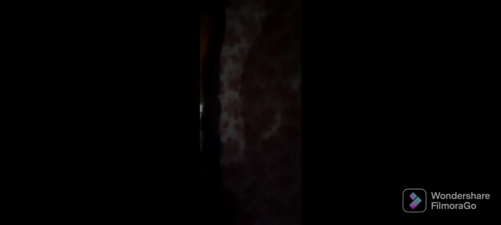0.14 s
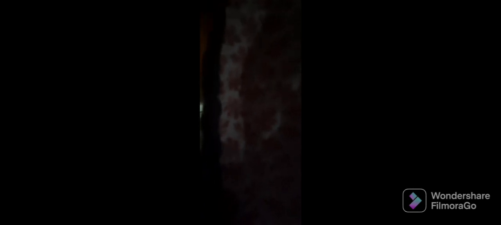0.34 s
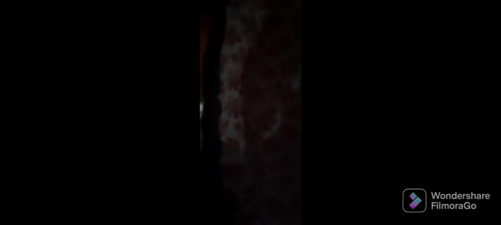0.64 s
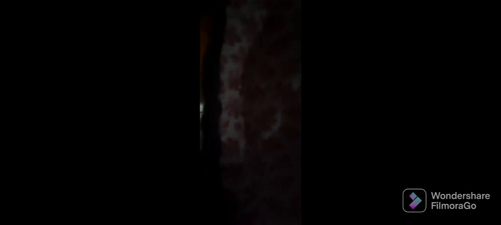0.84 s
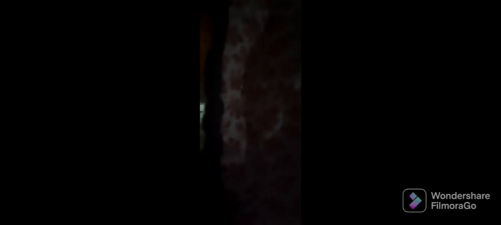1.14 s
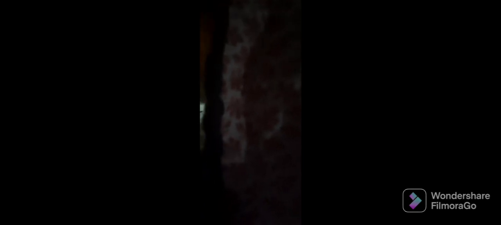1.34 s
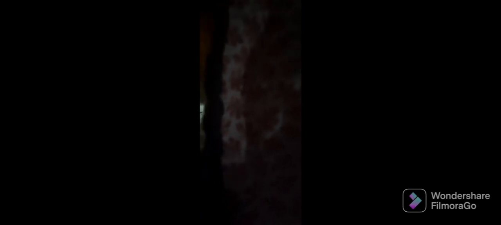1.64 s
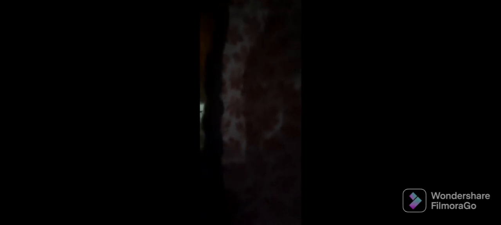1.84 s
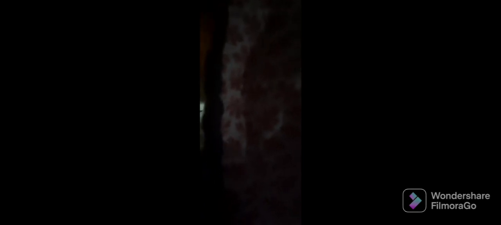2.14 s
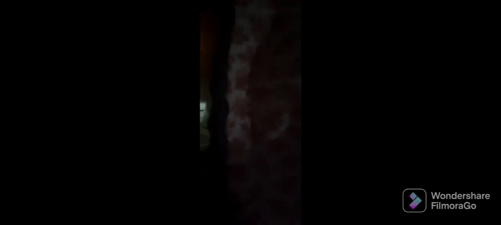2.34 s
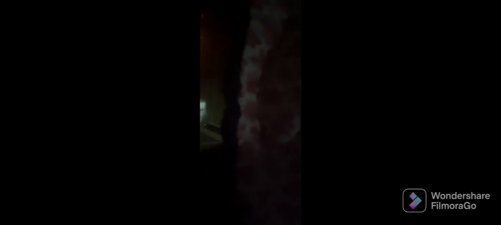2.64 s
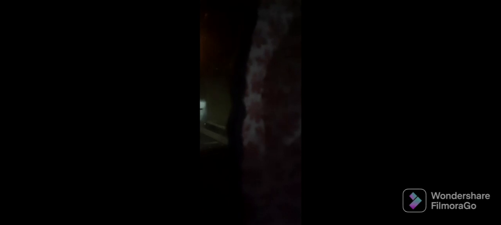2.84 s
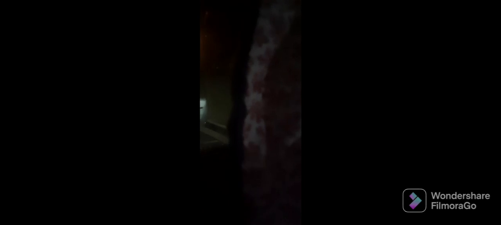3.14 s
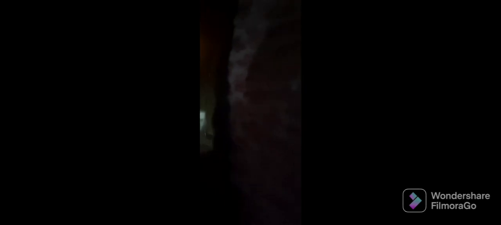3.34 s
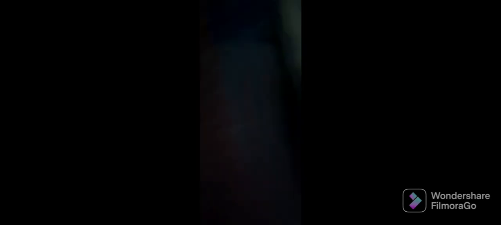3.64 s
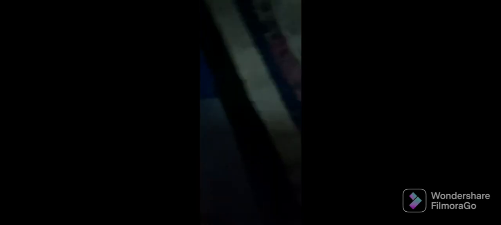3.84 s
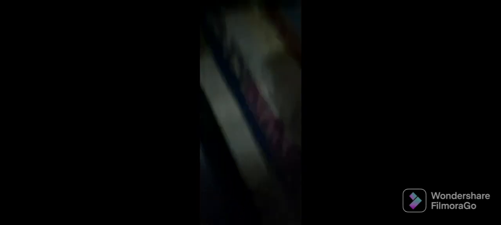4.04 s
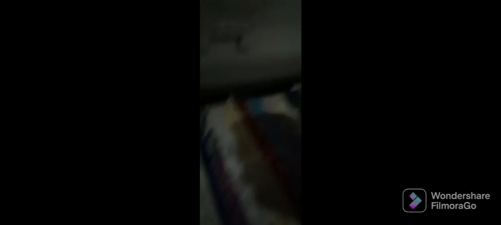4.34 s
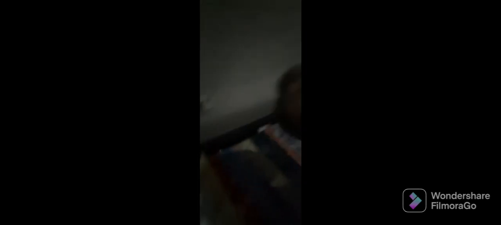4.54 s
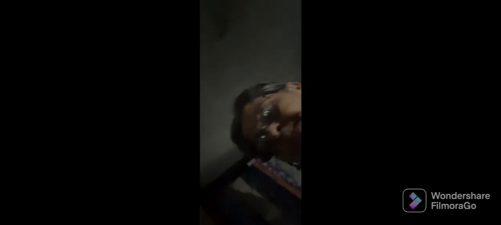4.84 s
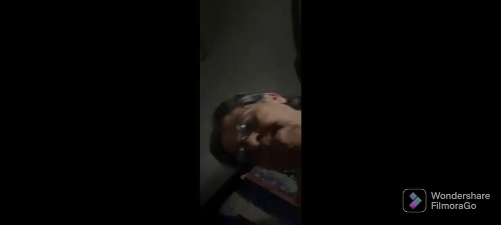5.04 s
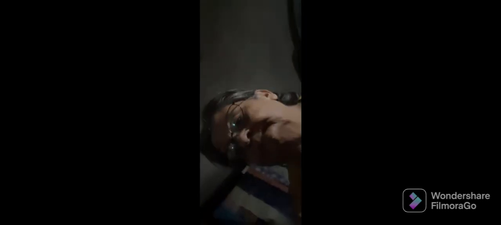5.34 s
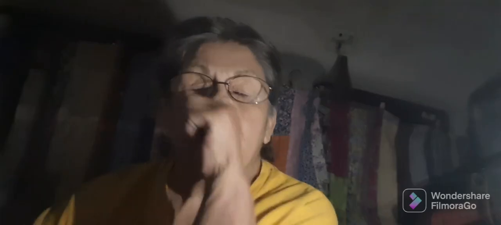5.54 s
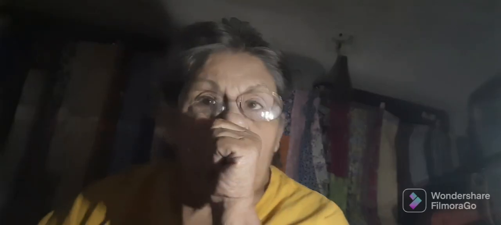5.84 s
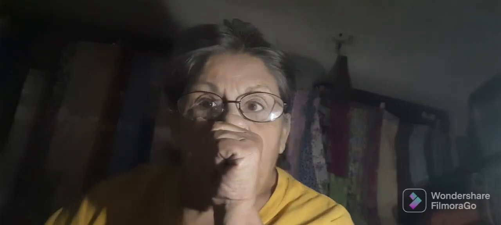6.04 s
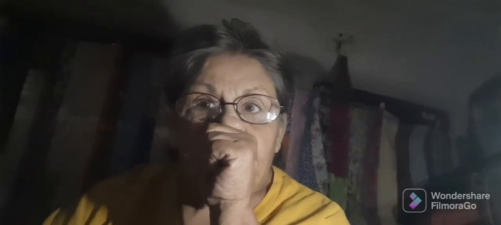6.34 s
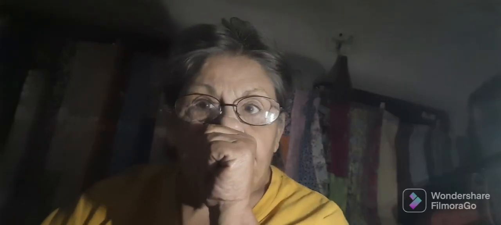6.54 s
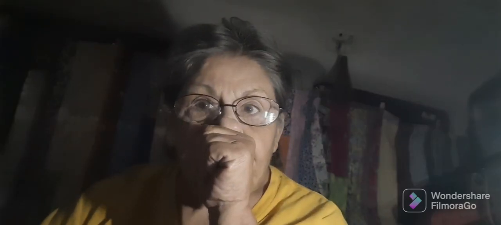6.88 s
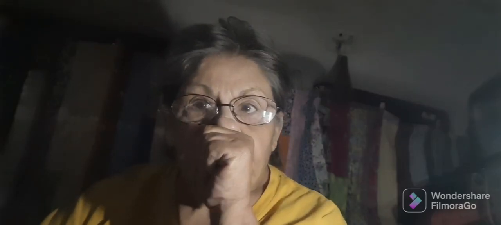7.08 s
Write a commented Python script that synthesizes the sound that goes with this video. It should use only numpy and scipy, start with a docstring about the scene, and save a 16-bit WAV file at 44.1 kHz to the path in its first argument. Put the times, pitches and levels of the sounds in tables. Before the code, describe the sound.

Two hollow car-lock clunks over a low hum, followed by a handheld device being turned: finger bumps, rustling crackles, a tiny metallic ting, brief dropout.

```python
"""Door lock and phone handling at night

Quiet night, low hum: a power door lock on the left clunks twice, a much softer stroke between; noise bursts
scrape its rod and click its latch, and damped sines boom its panel, muffled at the right microphone port.
Then the phone is turned round: shaped noise and short knocks rub and bump the right port, while crackling
noise for cloth and ringing sines for small metal sit close by the left. A distant whirr lies on the left.
The sound drops out for an instant and the hum carries on."""
import sys
import numpy as np
from scipy import signal
from scipy.fft import rfft, irfft, next_fast_len
from scipy.io import wavfile
from scipy.ndimage import uniform_filter1d, map_coordinates

SR = 44100
rng = np.random.default_rng(int(sys.argv[2]) if len(sys.argv) > 2 else 0)


def dump_mix(stems):
    """Bounce the given channels to the path in sys.argv[1] as a 16-bit WAV at rate SR."""
    frames = np.atleast_2d(stems).T  # one column per channel
    limited = np.clip(frames, -1, 1)  # hard clip at full scale
    pcm = np.round(limited * 32767).astype(np.int16)
    wavfile.write(sys.argv[1], SR, pcm)


N = 317961
T = np.arange(N) / SR  # time in the scene, s
AGE = np.arange(SR // 2) / SR  # time since a contact, s

# Lock strokes. Each row: start in seconds, travel in seconds, rod level in dB, panel offset in dB.
LOCK_STROKES = [(1.294, 0.055, -36.5, -1), (2.975, 0.05, -36, 0.5), (1.675, 0.078, -52.5, -19)]
# Pushes of every stroke on the panel. Each row: delay in seconds, peak in dB before the panel offset, pitch in Hz.
PANEL_PUSHES = [(.032, -23.5, 75.6), (.058, -20.5, 164), (.084, -23.5, 268), (.125, -28.5, 104)]
# The door settling. Each row: time in seconds, peak in dB, pitch of the push in Hz.
DOOR_THUDS = [(1.833, -34.5, 298), (1.856, -29, 67.5), (1.894, -33, 60.4), (2.115, -40.5, 73)]
# Panel modes. Each row: frequency in Hz, relative level in dB, t60 in seconds.
DOOR_MODES = [(77.5, -7, 0.21), (135.5, 0.5, 0.056), (198.3, -6, 0.059), (294.2, -4.5, 0.095),
              (334, -9, 0.12), (424, -5.5, 0.047), (502, -7, 0.042), (754, -10.5, 0.054),
              (1033, -16.5, 0.16)]
# Slack taken up in two joints. Each row: delay in seconds, peak over the rod level in dB, ring t60 in seconds.
ROD_JOINTS = [(0.0191, -3, 0.041), (.05, 4.5, 0.083)]
# Single dry clicks, of the latch and later of the phone's case. Each row: time in seconds, peak in dB,
# ring t60 in seconds.
DRY_CLICKS = [(0.9194, -52, 0.013), (1.0228, -47.5, .025), (1.3656, -16.5, 0.007), (1.502, -47, 0.06),
              (1.6833, -47, 0.0079), (1.7208, -32.5, 0.0088), (1.7453, -45.5, .012), (2.2865, -54, 0.026),
              (2.7199, -47.5, 0.018), (3.184, -47.5, 0.053), (5.34, -45, 0.0016), (5.4452, -50.5, .003)]
# Colour of the scraping rod. Each row: frequency in Hz, relative level in dB.
ROD_COLOUR = [(150, -21.5), (300, 5), (450, 0), (750, -14), (1250, -8.5), (2200, -22), (8000, -41),
              (15500, -44.5)]
# Colour of all the dry clicks. Each row: frequency in Hz, relative level in dB.
CLICK_COLOUR = [(700, -3), (2200, -5), (3900, -4.5), (5200, -8), (8500, -11), (11000, -3.5), (15500, -14)]
# Muffling of the lock at the right port, which faces away. Each row: frequency in Hz, gain in dB.
RIGHT_PORT_SHADE = [(60, -2), (200, -5), (700, -11), (1300, -15), (3500, -27)]
# Finger slides over the right port. Each row: start in seconds, length in seconds, relative pressure in dB,
# scratch level in dB, scratch pitch as a ratio.
FINGER_SLIDES = [(3.349, 0.14, -45, -60, 0.95), (3.427, 0.077, -44, -48, 0.82),
                 (3.559, 0.058, -44, -44.5, 0.95), (3.606, 0.085, -40.5, -45, 1.27),
                 (3.71, 0.074, -30.5, -42.5, 1.25), (3.822, 0.042, -28.5, -46.5, 1.3),
                 (3.926, .085, -41.5, -66, 1.17), (4.002, 0.092, -35.5, -57, 1.13),
                 (4.178, 0.11, -55.5, -62.5, 1), (4.383, 0.44, -54, -68.5, 0.82),
                 (4.646, 0.024, -34.5, -41, 0.76), (4.729, 0.031, -37.5, -50, 0.87)]
# Colour of dragging skin. Each row: frequency in Hz, relative level in dB per Hz.
SKIN_COLOUR = [(50, 3), (130, 2.5), (220, 0), (310, 5.5), (480, -6.5), (750, -18), (1200, -33.5),
               (3000, -62)]
# Colour of a scratch at pitch ratio 1. Each row: frequency in Hz, relative level in dB.
SCRATCH_COLOUR = [(400, -14), (800, 12), (1350, 11), (2100, -6.5), (2700, -27.5), (16000, -51)]
# Finger bumps on the case. Each row: time in seconds, peak at the louder port in dB, pitch it sags to in Hz,
# t60 in seconds, left minus right in dB.
FINGER_BUMPS = [(3.528, -30, 266, 0.11, 9), (3.566, -25, 88, 0.076, -10), (3.841, -18, 248, 0.012, -39),
                (3.853, -19, 162, 0.058, -26), (4.101, -25, 140, 0.054, -29),
                (4.1459, -23, 830, 0.0031, -34), (4.148, -17.5, 271.8, 0.039, -39.5),
                (4.21, -29, 261, 0.04, -32), (4.431, -21, 108, 0.034, -29.5), (4.661, -31, 744, 0.035, -29),
                (4.703, -18, 120, 0.028, -39), (4.747, -32, 740, 0.021, -22), (4.756, -19, 261, 0.02, -27),
                (5.341, -39.5, 484, 0.0033, -18)]
# Rumble of the turning case. Each row: time in seconds, level in dB.
CASE_SWAY = [(3.5, -55), (3.75, -38), (4.2, -43.5), (4.75, -54.5), (4.85, -64)]
# Cloth scrapes at the left port. Each row: start in seconds, length in seconds, level in dB.
CLOTH_SCRAPES = [(3.71, 0.23, -51), (4.015, 0.15, -55.5), (4.196, 0.13, -50.5), (4.432, 0.093, -59),
                 (4.619, .18, -50), (4.871, 0.066, -59), (4.992, 0.22, -69)]
# Colour of the cloth rustle. Each row: frequency in Hz, relative level in dB.
WEAVE_COLOUR = [(200, -19), (1000, -6), (4500, -4), (8500, -6.5), (13000, -3), (15800, -16.5)]
# Loud crackles at the left port. Each row: time in seconds, peak in dB, relative body level in dB.
LOUD_CRACKLES = [(3.5025, -43, -23), (3.563, -43.5, -16), (3.674, -37, -11.5), (3.697, -35, -15.5),
                 (3.7155, -25.5, -15), (3.729, -34.5, -26), (3.8045, -22.5, -17), (3.8635, -28, -14.5),
                 (3.921, -31.5, -14.5), (3.9457, -37.5, -17), (4.0165, -29.5, -16.5), (4.034, -35, -21),
                 (4.0925, -29.5, -25), (4.1815, -30.5, -33), (4.204, -29, -32), (4.213, -27.5, -31.5),
                 (4.226, -27.5, -26.5), (4.2515, -30.5, -25), (4.283, -24.5, -26), (4.312, -35, -22.5),
                 (4.342, -32.5, -34), (4.445, -29.5, -29.5), (4.4674, -28.5, -27.5), (4.5765, -27, -29.5),
                 (4.5948, -28.5, -19.5), (4.7465, -33, -6), (4.777, -34, -5), (4.7945, -31.5, -1.5),
                 (4.8756, -43, -6.5), (4.8995, -47, -4.5), (4.9215, -33.5, -7.5), (4.9995, -39, 3),
                 (5.016, -42, 8.5), (5.163, -29.5, 3.5), (5.2084, -42, 11.5), (5.3877, -51, 9.5)]
# A crackle's hiss. Each row: frequency in Hz, relative level in dB per Hz.
SNAP_COLOUR = [(1500, -33.5), (4200, -6), (14000, 5), (16000, -4)]
# A crackle's hollow body. Each row: frequency in Hz, relative level in dB per Hz.
BODY_COLOUR = [(400, -15.5), (1100, 2), (1400, -10), (1850, 3), (2750, -3.5), (4000, -16.5), (9000, -34)]
# Small metal pieces touching. Each row: time in seconds, peak in dB, centre in Hz of the band that rings,
# its half width in Hz.
METAL_TOUCHES = [(4.6267, -25.5, 14820, 70), (4.6746, -14.5, 12900, 4990)]
# Modes of the metal. Each row: frequency in Hz, relative level in dB before a random scatter, t60 in seconds.
METAL_MODES = [(2020, -9, .17), (9775, 0, .085), (11248, -10, .17), (13595, 5, .085), (14830, -12, .12),
               (15139, 3, .15)]
# Reverberation. Each row: frequency in Hz, t60 in seconds.
ROOM_DECAY = [(100, 0.83), (2000, 0.21), (12000, 0.12)]
# Low hum. Each row: frequency in Hz, level in dB before its wavering and the trim of each port.
HUM_TONES = [(44, -60), (82, -56.5), (138, -66.5)]
# Colour of the rumbling floor. Each row: frequency in Hz, relative level in dB.
FLOOR_COLOUR = [(25, -19.5), (43, -3), (85, -4), (150, -8.5), (200, -22), (320, -22), (450, -35),
                (3000, -51.5), (8500, -59), (15000, -53.5)]
# Left-right likeness of the floor. Each row: frequency in Hz, share of power in common.
PORT_LIKENESS = [(60, 0.73), (130, 0.91), (290, 0.12), (640, 0.056)]
# Distant whirr on the left. Each row: time in seconds, level in dB.
WHIRR_LEVEL = [(0, -59.5), (1.8, -62), (2.9, -67), (5.46, -65)]
# Colour of the whirr. Each row: frequency in Hz, relative level in dB per Hz.
WHIRR_COLOUR = [(60, -7.5), (140, 10), (330, 11.5), (780, -11), (1100, 1.5), (1400, -1.5), (1800, -2.5),
                (2300, -18.5), (6000, -55.5)]
# Thin lower whistle in the whirr. Each row: time in seconds, level in dB.
LOW_WHISTLE_LEVEL = [(0, -89), (0.5, -69), (0.98, -75), (1.1, -64), (1.2, -77), (1.8, -69.5), (2.3, -92)]
# Fuzzier upper whistle. Each row: time in seconds, centre pitch in Hz.
HIGH_WHISTLE_DRIFT = [(0, 1715), (2, 1709), (2.8, 1500)]
# Dull air after the dropout. Each row: frequency in Hz, relative level in dB per Hz.
MURK_COLOUR = [(250, -6), (620, 0.5), (1300, -20), (5000, -36)]
# The dropout: start in seconds, end in seconds.
DROPOUT = (5.463, 5.503)

KICK_HZ, KICK_DB, KICK_T60_S = 500, -28, 0.07  # knock opening each stroke; peak before the panel offset
KICK_SAG_S = 0.05  # time constant of its fall in pitch
SOFT_T60_S = 0.056  # clicks that ring longer than about this lose their treble
SLIDE_ATTACK_S, SLIDE_RELEASE_S = 0.02, 0.021  # rise time; time constant of the fall
BUMP_SHARP, BUMP_SAG_S = 0.46, 0.0049  # share above its pitch where a knock starts; time constant of the sag
SCRAPE_ATTACK_S, SCRAPE_RELEASE_S = 0.016, 0.04  # rise time; time constant of the fall
SMALL_PER_S, SMALL_DB = 35, 11  # small crackles in a scrape: rate, mean peak over its level
SMALL_SCATTER_DB, SMALL_BODY_DB = 2.5, -13.5  # spread of their peaks, relative body level
CRACKLE_ATTACK_S = 0.00096  # time constant of the rise
SHIFT_S, SHIFT_LENGTH_S, SHIFT_DB = 3.33, 0.46, -44.5  # the grip shifts by the left port
SHIFT_ATTACK_S, SHIFT_RELEASE_S = 0.17, 0.05  # rise time; time constant of the fall
WHISTLE_HZ = 1094  # the lower whistle
DRIFT_DB = -15  # the upper whistle, relative to the whirr
TOP_HZ = 15900  # band limit


def amp(db):
    """Decibels to gain."""
    return 10 ** (np.asarray(db) / 20)


def unit(x):
    """Scale to rms 1."""
    return x / np.sqrt(np.mean(x ** 2) + 1e-20)


def crest(x):
    """Scale to peak 1."""
    return x / np.abs(x).max()


def fade(t60):
    """Free decay of a ring: 60 dB down after t60 seconds."""
    return 1000 ** (-AGE / max(t60, 1e-3))


def along(points, hz):
    """Interpolate (Hz, value) points on a log frequency axis."""
    f, v = np.transpose(points)
    return np.interp(np.log(hz + 1), np.log(f + 1), v)


def levels(rows):
    """A gain per sample for each dB column, silent outside the rows."""
    s, *columns = np.transpose(rows)
    return [amp(np.interp(T, s, db, left=-120, right=-120)) for db in columns]


def wobble(rate):
    """A smooth random curve, rate knots a second."""
    knots = rng.standard_normal(int(N * rate / SR) + 4)
    return map_coordinates(knots, [T * rate])


def colour(x, points):
    """Causal minimum-phase filter with the given (Hz, dB) gain."""
    n = x.shape[-1]
    m = 2 * next_fast_len(n // 2 + 4096)
    gain = amp(along(points, np.fft.rfftfreq(m, 1 / SR)))
    cepstrum = irfft(np.log(gain))
    cepstrum[1:m // 2] *= 2  # fold the cepstrum forward in time
    cepstrum[m // 2 + 1:] = 0
    return irfft(rfft(x, m) * np.exp(rfft(cepstrum)), m)[..., :n]


def friction(spectrum, grain_db, grain_rate):
    """Coloured noise of rms 1 that catches and slips in grains."""
    grains = rng.standard_normal(N) * amp(grain_db * wobble(grain_rate))
    return unit(colour(grains, spectrum))


def patchy(x, depth_db):
    """Short-lived resonances, rms 1: the gain varies in patches of frequency and time."""
    z = signal.stft(x, nperseg=256)[2]
    field = uniform_filter1d(rng.standard_normal(z.shape), size=5, axis=0)
    field = uniform_filter1d(field, size=12, axis=1)
    return unit(signal.istft(z * amp(depth_db * unit(field)), nperseg=256)[1][:len(x)])


def swell(start, length, attack, release):
    """A contact rises, holds until its length is up and dies away."""
    rise = np.clip((T - start) / attack, 0, 1)
    return rise * np.exp(-np.maximum(T - start - length, 0) / release)


def moments(start, length, rate):
    """Unevenly spaced times, about rate a second."""
    slots = np.arange(0, length, 1 / rate)
    return start + slots + rng.random(64)[:len(slots)] / rate


def add(track, s, sound):
    """Mix a sound in at time s."""
    part = track[round(s * SR):][:len(sound)]
    part += sound[:len(part)]


def lock():
    """The lock is on the left; the right port hears it muffled, and both hear its reverberation."""
    boom, rattle = kicks() + panel(), scrape_and_clicks()
    echo = amp(-15) * room(rattle)
    left, right = boom + rattle + amp(-14.5) * room(boom) + echo
    return np.array([left, colour(right, RIGHT_PORT_SHADE)])


def kicks():
    """The actuator kicks at the start of each stroke with one hollow knock that sags in pitch."""
    out = np.zeros(N)
    cycles = KICK_HZ * KICK_SAG_S * (1 - np.exp(-AGE / KICK_SAG_S))
    knock = crest(np.sin(2 * np.pi * cycles) * fade(KICK_T60_S) * (1 - np.exp(-cycles / 2)))
    for start, _, _, panel_db in LOCK_STROKES:
        add(out, start, amp(panel_db + KICK_DB) * knock)
    return out


def panel():
    """Each push rings the door modes, most strongly those nearest to its own pitch."""
    out = np.zeros(N)
    pushes = [(start + delay, panel_db + db, hz)
              for start, _, _, panel_db in LOCK_STROKES for delay, db, hz in PANEL_PUSHES]
    for s, db, push_hz in pushes + DOOR_THUDS:
        ring = np.zeros(len(AGE))
        for hz, level, t60 in DOOR_MODES:
            nearness = 1 / (1 + 1.25 * np.log2(hz / push_hz) ** 2)
            ring += amp(level) * nearness * np.sin(2 * np.pi * hz * AGE) * fade(t60)
        onset = 1 - np.exp(-AGE * push_hz / 0.51)
        add(out, s, amp(db) * crest(ring * onset))
    return out


def scrape_and_clicks():
    """The rod scrapes harder up to its end stop; the joints, the latch and later the phone's case click."""
    travel, clicks = np.zeros(N), np.zeros(N)
    for start, length, db, _ in LOCK_STROKES:
        push = np.clip((T - start) / length, 0, 1) ** 0.27
        travel += amp(db) * push * np.exp(-np.maximum(T - start - length, 0) / 0.031)
    joints = [(start + delay, rod_db + db, t60)
              for start, _, rod_db, _ in LOCK_STROKES for delay, db, t60 in ROD_JOINTS]
    for s, db, t60 in joints + DRY_CLICKS:
        loss = 20 * np.log10(1 + (t60 / SOFT_T60_S) ** 4)
        tone = [(hz, level - loss * (hz > 5000)) for hz, level in CLICK_COLOUR]
        burst = rng.standard_normal(len(AGE)) * fade(t60)
        add(clicks, s, amp(db) * crest(colour(burst, tone)))
    return travel * friction(ROD_COLOUR, grain_db=1.5, grain_rate=360) + clicks


def fingers():
    """Skin drags over the case in short slides, each scratching at its own pitch; hard scratching hisses."""
    pressure, scratch, out = np.zeros((3, N))
    grain = patchy(rng.standard_normal(N) * amp(2.5 * wobble(570)), depth_db=4.5)
    for start, length, pressure_db, scratch_db, pitch in FINGER_SLIDES:
        slide = swell(start, length, SLIDE_ATTACK_S, SLIDE_RELEASE_S)
        pressure = np.maximum(pressure, amp(pressure_db) * slide)
        scratch = np.maximum(scratch, amp(scratch_db) * slide)
        first = round(start * SR)
        span = slice(first, first + len(AGE))
        tone = [(hz * pitch, db) for hz, db in SCRATCH_COLOUR]
        out[span] += amp(scratch_db) * slide[span] * unit(colour(grain[span], tone))
    drag = patchy(friction(SKIN_COLOUR, grain_db=3, grain_rate=210), depth_db=2.5)
    out += amp(4.5) * pressure * drag
    hiss = friction([(2500, -24.5), (3800, -2.5), (6400, 3), (9000, -10.5)], grain_db=-3.5, grain_rate=480)
    return out + amp(18.0) * pressure * scratch * hiss


def bumps():
    """Fingers bump the case with short dead knocks that sag in pitch, loudest at the nearer port."""
    out = np.zeros((2, N))
    for s, db, hz, t60, left_db in FINGER_BUMPS:
        cycles = hz * (AGE + BUMP_SHARP * BUMP_SAG_S * (1 - np.exp(-AGE / BUMP_SAG_S)))
        skin = unit(colour(rng.standard_normal(len(AGE)), SKIN_COLOUR))
        knock = np.sin(2 * np.pi * cycles) + 0.41 * skin
        knock = crest(knock * fade(t60) * (1 - np.exp(-AGE * hz)) ** 2)
        add(out[0], s, amp(db + min(left_db, 0)) * knock)
        add(out[1], s, amp(db - max(left_db, 0)) * knock)
    return out


def sway():
    """The turning case rumbles differently at each port."""
    low = [(25, -24.5), (50, 1.5), (140, -3.5), (500, -50)]  # Hz, relative dB
    rumble = [friction(low, grain_db=5.5, grain_rate=17) for _ in range(2)]
    return levels(CASE_SWAY)[0] * np.array(rumble)


def cloth():
    """A finely grained rustle in uneven scrapes; the harder the scrape, the louder its small crackles."""
    weave = friction(WEAVE_COLOUR, grain_db=4, grain_rate=600)
    rustle = patchy(weave * amp(2.5 * wobble(35)), depth_db=4)
    scrapes = [amp(db) * swell(s, length, SCRAPE_ATTACK_S, SCRAPE_RELEASE_S) for s, length, db in CLOTH_SCRAPES]
    out = rustle * np.max(scrapes, axis=0)
    shift = swell(SHIFT_S, SHIFT_LENGTH_S, SHIFT_ATTACK_S, SHIFT_RELEASE_S)
    out += amp(SHIFT_DB) * shift * friction(SKIN_COLOUR[1:], grain_db=4.5, grain_rate=66)
    for s, db, body_db in LOUD_CRACKLES:
        add(out, s, amp(db) * crackle(body_db))
    for start, length, db in CLOTH_SCRAPES:
        for s in moments(start, length, SMALL_PER_S):
            small_db = db + SMALL_DB + SMALL_SCATTER_DB * rng.standard_normal()
            add(out, s, amp(small_db) * crackle(SMALL_BODY_DB))
    return out


def crackle(body_db):
    """One snap of peak 1: a bright hiss over a few small hollow resonances."""
    hiss, body = rng.standard_normal((2, len(AGE)))
    snap = patchy(colour(hiss, SNAP_COLOUR), depth_db=4.5) + amp(body_db) * unit(colour(body, BODY_COLOUR))
    return crest(snap * fade(0.059) * (1 - np.exp(-AGE / CRACKLE_ATTACK_S)))


def jingle():
    """Small metal pieces ring high; each touch favours the modes in one band."""
    out = np.zeros(N)
    for s, db, centre_hz, width_hz in METAL_TOUCHES:
        ring = np.zeros(len(AGE))
        for hz, level, t60 in METAL_MODES:
            favour = 1 / (1 + ((hz - centre_hz) / width_hz) ** 2)
            ring += amp(level + rng.normal(0, 2.3)) * favour * np.sin(2 * np.pi * hz * AGE) * fade(t60)
        tick = 0.1 * rng.standard_normal(len(AGE)) * fade(0.0085)
        add(out, s, amp(db) * crest(crest(ring) + tick))
    return out


def room(x):
    """A diffuse tail for each port; the treble dies first."""
    hz, t, z = signal.stft(rng.standard_normal((2, SR // 2)), SR, nperseg=256)
    decay = amp(-60 * t / along(ROOM_DECAY, hz)[:, None])
    tail = signal.istft(z * decay, SR, nperseg=256)[1]
    return signal.fftconvolve(x[None], tail / np.linalg.norm(tail[0]), axes=1)[:, :N]


def night():
    """A wavering low hum over a rumbling floor, a weakening whirr, and dull air after the dropout."""
    hum = np.zeros(N)
    for hz, db in HUM_TONES:
        tone = np.sqrt(2) * np.sin(2 * np.pi * hz * T + 1.0 * wobble(9))
        hum += amp(db + 4.0 * wobble(4.1)) * tone
    turned = 1.0 * ((T > 4.8) & (T < DROPOUT[1]))
    hum *= amp(-8 * uniform_filter1d(turned, size=2048))  # dips once the phone has turned, until the dropout ends
    common, left, right = [friction(FLOOR_COLOUR, grain_db=3.0, grain_rate=4.8) for _ in range(3)]
    shared = [(hz, 10 * np.log10(np.clip(c, 1e-3, 1))) for hz, c in PORT_LIKENESS]
    apart = [(hz, 10 * np.log10(np.clip(1 - c, 1e-3, 1))) for hz, c in PORT_LIKENESS]
    floor = amp(-55.0) * (colour(common, shared) + colour(np.array([left, right]), apart))
    air = unit(colour(rng.standard_normal(N), WHIRR_COLOUR))
    whirr = levels(WHIRR_LEVEL)[0] * air + whistles()
    dull = [amp(db) * unit(colour(rng.standard_normal(N), MURK_COLOUR)) for db in (-75, -80)]
    murk = (T > DROPOUT[1]) * np.array(dull)
    return (hum + floor) * amp([[1], [-1]]) + whirr * amp([[0], [-26]]) + murk


def whistles():
    """Two thin whistles ride on the whirr: the lower swells and ebbs, the upper drifts down with the whirr."""
    low = levels(LOW_WHISTLE_LEVEL)[0] * np.sin(2 * np.pi * WHISTLE_HZ * T + 0.8 * wobble(22))
    hz = np.interp(T, *np.transpose(HIGH_WHISTLE_DRIFT)) + 35 * wobble(25)
    high = levels(WHIRR_LEVEL)[0] * amp(DRIFT_DB) * np.sin(2 * np.pi * np.cumsum(hz) / SR)
    return np.sqrt(2) * (low + high)


def scene():
    """Rubbing, cloth and metal stay almost wholly on the port they are close to; lock and night reach both."""
    steady = night()
    door = lock()
    grip = sway() + bumps() + fingers() * amp([[-29], [0]])
    near_left = jingle() + cloth()
    echo = room(near_left) * amp([[-22], [-30]])
    return steady + door + grip + near_left * amp([[0], [-35]]) + echo


def record(dry):
    """The microphone sheds the deepest bass; a brief dropout; nothing above the band limit."""
    heard = signal.sosfilt(signal.butter(N=5, Wn=35, btype="highpass", fs=SR, output="sos"), dry)
    live = np.where((T > DROPOUT[0]) & (T < DROPOUT[1]), 0., 1.)
    live = uniform_filter1d(live, size=128)  # softened edges
    in_band = np.fft.rfftfreq(N, 1 / SR) < TOP_HZ
    return irfft(rfft(heard * live) * in_band, N)


dry = scene()
out = record(dry)
dump_mix(out)
```